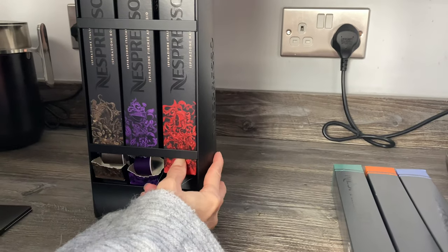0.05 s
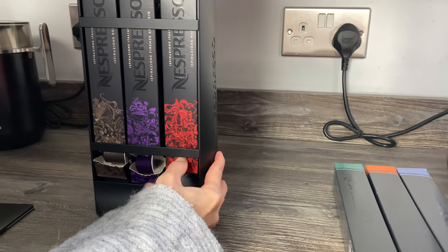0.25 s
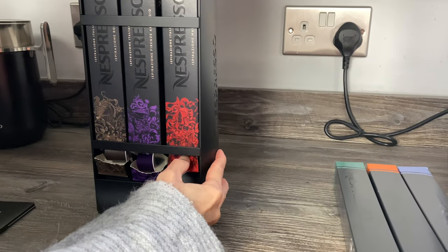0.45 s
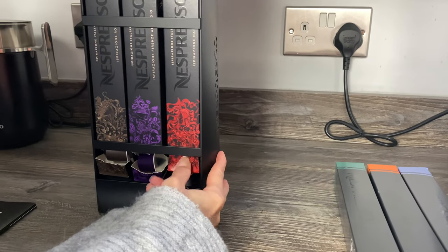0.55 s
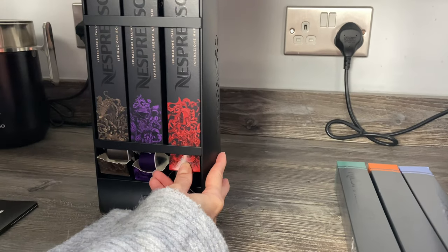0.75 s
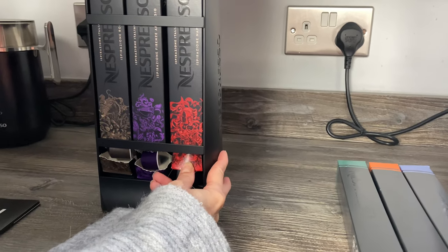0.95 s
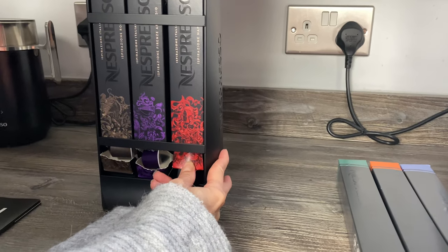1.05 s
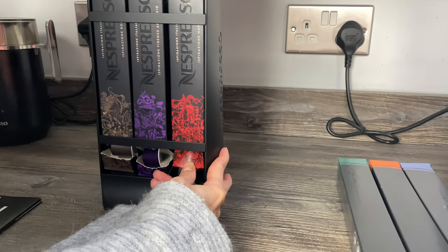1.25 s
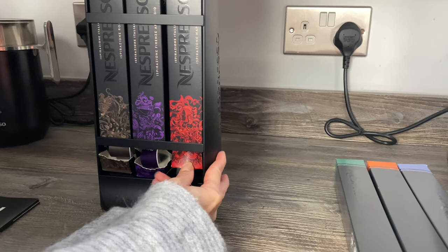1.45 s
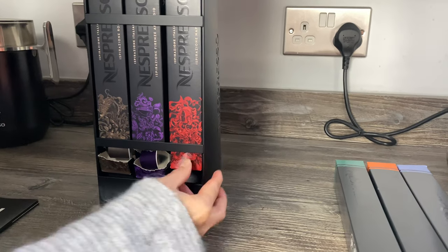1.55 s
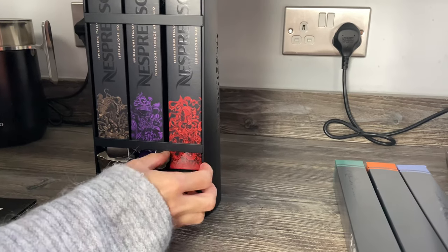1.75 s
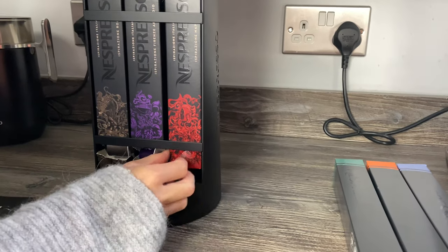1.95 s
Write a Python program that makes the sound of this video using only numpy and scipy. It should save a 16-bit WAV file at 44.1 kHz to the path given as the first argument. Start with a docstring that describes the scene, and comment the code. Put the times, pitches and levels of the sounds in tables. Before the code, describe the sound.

A loud plastic clack from a capsule dispenser, then ticks, scrapes and lighter clacks.

```python
"""A faint rub, then a loud clack and rattle: a stack of capsules drops in a plastic dispenser.
Their cardboard sleeve sticks and slips in a run of ticks and scrapes along its guide.
Two lighter clacks follow, then fingers tap, bump and rub. Hard contacts ring the case and sleeve.
The kitchen counter and wall reflect at once, the small quiet room a little later."""
import sys
import numpy as np
from scipy import signal
from scipy.fft import rfft, irfft, next_fast_len
from scipy.io import wavfile

SR = 44100
rng = np.random.default_rng(int(sys.argv[2]) if len(sys.argv) > 2 else 0)


def persist_wave(psi):
    """Save psi, clipped to +-1, as 16-bit WAV."""
    counts = np.round(np.clip(psi, -1, 1) * 32767).astype(np.int16)
    wavfile.write(sys.argv[1], SR, np.atleast_2d(counts).T)


N = 88200
T = np.arange(SR // 4) / SR  # time axis of one contact
HAND_PAN_DB, BASS_PAN_DB = 2, 3

# Plastic case modes: pitch_hz, level_db, t60_s
CASE_MODES = [(424, -3.5, 0.11), (445, -5.5, 0.24), (702, -22, 0.075), (827, -0.5, 0.26), (917, 6.5, 0.057),
              (949, 0.5, 0.098), (1243, -20, .07), (1734, -21.5, 0.056), (2070, -7, 0.036),
              (2405, -8, 0.21), (3030, -38, .05), (3640, 7.5, .05), (3984, -10.5, 0.026),
              (4730, -12.5, .04)]
# Cardboard sleeve modes: pitch_hz, level_db, t60_s
SLEEVE_MODES = [(820, -4, .035), (950, -5, .035), (1640, -2, .03), (2200, -5, .02), (2860, -8, .025),
                (4020, 4, .022), (4450, -3, .016), (5090, 6, .022)]


def clacks(sleeve_db=-8):
    """The capsule stack hits the case, ringing case and sleeve."""
    # start_s, level_db, tilt_db_per_octave, case_db, pan_db
    impacts = [(0.2346, 8, 5, -7.5, 0.5), (.2366, 8, 2.5, -14.5, -0.5), (0.2382, -2, 0.5, -29, 11),
               (0.2468, -16, -15, 10, 4), (0.2557, -5.5, 6.5, -6, -2.5), (0.257, -16.5, -5, -12, 4),
               (0.2604, -4, 1, -8, -0.5), (0.2703, -5.5, -1, -6.5, -5), (1.0721, -6, 2.5, -7, 4),
               (1.0839, -15, 0, -22, -7.5), (1.118, -9, 2, -7, 2.5), (1.1316, -16.5, -8, -8, -0.5)]
    # Impact spectrum: freq_hz, gain_db
    tone = [(100, -19.5), (350, -4), (420, -10), (570, -22), (720, -9), (950, 3.5), (1400, -3.5),
            (2100, 3.5), (3300, -9), (4000, -1), (4500, -2.5), (5050, -1), (5800, -12.5), (7000, -12.5),
            (11000, -15.5), (13500, -26.5), (16000, -13)]
    out = np.zeros((2, N))
    for start_s, level_db, tilt, case_db, pan_db in impacts:
        hit = contact(tone, t60_s=0.017, snap_db=-3.5, lag_s=0.00007, buzz_hz=7000)
        hit += amp(case_db) * ring(CASE_MODES, spread_hz=1500)
        hit += amp(sleeve_db) * ring(SLEEVE_MODES, spread_hz=1200)
        add(out, start_s, amp(level_db) * pan(pan_db) * tilted(hit, tilt))
    return room(out, tail_db=-6)


def slips(ring_db=-3, catch_s=0.0018, catch_db=-3.5):
    """Stick-slip of the sleeve: a bright tick, then a duller knock as the card catches."""
    # start_s, level_db, tilt_db_per_octave
    releases = [(.5096, -20.5, 6.5), (0.5205, -23.5, 5.5), (0.532, -21.5, 1.5), (0.5886, -18.5, 2.5),
                (0.5993, -15, -1), (0.609, -18.5, 2), (.6184, -16, -1), (0.6498, -14.5, 2),
                (0.6993, -11.5, 2), (0.7534, -10.5, 3.1)]
    # Tick and catch spectrum: freq_hz, gain_db
    tone = [(100, -10), (450, -6.5), (620, -14.5), (850, 2.5), (1250, -4.5), (1650, -1.5), (2500, -7.5),
            (3550, -5), (4020, 4.5), (4550, 1), (5100, -1.5), (5600, -9.5), (6400, -12), (9000, -24.5),
            (16000, -27.5)]
    out = np.zeros((2, N))
    for start_s, level_db, tilt in releases:
        tick = contact(tone, t60_s=0.0205, snap_db=-7, lag_s=0.0001, buzz_hz=7870)
        tick += amp(ring_db) * ring(SLEEVE_MODES, spread_hz=3800)
        catch = contact(tone, t60_s=0.025, snap_db=-9.5, lag_s=0, buzz_hz=2200)
        slip = np.zeros((2, N))
        add(slip, start_s, amp(level_db) * tilted(tick, tilt))
        add(slip, start_s + catch_s, amp(level_db + catch_db) * catch)
        out += room(slip * pan(3.5), tail_db=-6)
    return out


def taps(ring_db=-9):
    """Fingertips and capsules touch the case and ring it lightly."""
    # start_s, level_db, tilt_db_per_octave
    touches = [(.103, -27, 1.5), (.9545, -22, -1.5), (1.029, -27, -6.5), (1.056, -25, -8),
               (1.1705, -28, -1), (1.206, -24.5, -21), (1.256, -29, -6), (1.3062, -19.5, -2.5),
               (1.3617, -27, -9.5), (1.382, -29, -4.5), (1.483, -19.5, 0), (1.494, -22.5, -12),
               (1.639, -28, -2.5), (1.6532, -26, -1.5), (1.6932, -30.5, -2), (1.7085, -21, -6.5),
               (1.744, -24.5, -10.5), (1.8752, -24.5, -2)]
    # Tap spectrum: freq_hz, gain_db
    tone = [(100, -2.5), (400, -20), (1000, 1), (2200, 0), (3000, -3.5), (4700, 3.5), (7000, -8.5),
            (11000, -7.5), (16000, -15.5)]
    out = np.zeros((2, N))
    for start_s, level_db, tilt in touches:
        hit = contact(tone, t60_s=0.03, snap_db=-6, lag_s=0.0001, buzz_hz=8700)
        hit += amp(ring_db) * ring(CASE_MODES, spread_hz=1800)
        add(out, start_s, amp(level_db) * tilted(hit, tilt))
    return out * pan(HAND_PAN_DB)


def thumps(attack_cycles=0.79, puff_gain=0.84):
    """Dull knocks on the case, and the room's low boom after the loud clack: damped note plus puff."""
    # start_s, level_db, pitch_hz, t60_s
    thuds = [(.236, -10, 261, 0.073), (.236, -6.5, 695, 0.14), (.236, -7, 405.3, 0.11),
             (0.239, -19, 138, .12), (.2385, 0, 910, 0.037), (.256, -2, 943, 0.02),
             (0.2578, -0.5, 1240, 0.017), (0.266, -21, 95, .3), (0.455, -26, 359, 0.11),
             (.505, -32.5, 107, 0.11), (.782, -27.5, 279, 0.091), (.765, -23.5, 127, .2),
             (0.824, -28.5, 225, 0.038), (.975, -26, 94.7, .2), (1.074, -19.5, 125, .25),
             (1.078, -17, 502, 0.095), (1.14, -21, 157, 0.14), (1.367, -23.5, 313, 0.11),
             (1.486, -23.5, 217, 0.24), (1.487, -24, 329, 0.074), (1.588, -27.5, 187, 0.074),
             (1.6, -34, 178, 0.027), (1.64, -19.5, 377, 0.042), (1.639, -23.5, 785, 0.098),
             (1.799, -24, 324, 0.028), (1.819, -16, 245, 0.036), (1.842, -21, 118, 0.059)]
    out = np.zeros((2, N))
    for start_s, level_db, pitch_hz, t60_s in thuds:
        envelope = amp(-60 * T / t60_s) * (1 - np.exp(-T * pitch_hz / attack_cycles))
        note = envelope * np.sin(2 * np.pi * pitch_hz * T)
        puff = colour(noise(len(T)) * envelope, band(pitch_hz, half_width_octaves=0.48))
        add(out, start_s, amp(level_db) * unit(unit(note[None]) + puff_gain * unit(puff)))
    return out * pan(BASS_PAN_DB)


def rubs():
    """Skin and sleeve slide on card: a papery body and a high sheen."""
    # centre_s, sigma_s, level_db, sheen_db
    strokes = [(0.2, 0.088, -65, -8.5), (1.441, 0.055, -65.5, 0.5), (1.502, 0.018, -56.5, -10),
               (1.765, 0.034, -59, -9.5), (1.913, 0.019, -59.5, -12.5), (1.983, 0.011, -51.5, -8.5)]
    # Body spectrum: freq_hz, gain_db
    body_tone = [(200, -6), (900, 4.5), (2800, -6), (4200, 5), (5800, 0), (8000, -17), (11000, -15.5),
                 (15500, -33)]
    # Sheen spectrum: freq_hz, gain_db
    sheen_tone = [(200, -36), (4000, -32.5), (7500, 1), (9200, -15), (11000, 3), (12300, -9),
                  (13500, -12.5), (15000, -3.5), (16500, -23)]
    body, sheen = friction(curve(body_tone)), friction(curve(sheen_tone))
    out = np.zeros((2, N))
    for centre_s, sigma_s, level_db, sheen_db in strokes:
        out += amp(level_db) * swell(centre_s, sigma_s) * (body + amp(sheen_db) * sheen)
    return out * pan(HAND_PAN_DB)


def scrapes():
    """The sleeve drags along the plastic guide; each stroke sings faintly in one resonance."""
    # centre_s, sigma_s, level_db, pitch_hz, half_width_octaves
    strokes = [(0.233, 0.007, -39, 1930, 0.23), (0.786, 0.027, -50.5, 2600, 0.41),
               (0.836, 0.041, -57.5, 2500, 0.096), (1.754, 0.014, -57.5, 3020, 0.21)]
    out = np.zeros((2, N))
    for centre_s, sigma_s, level_db, pitch_hz, half_width_octaves in strokes:
        out += amp(level_db) * swell(centre_s, sigma_s) * friction(band(pitch_hz, half_width_octaves))
    return out * pan(HAND_PAN_DB)


def contact(tone, t60_s, snap_db, lag_s, buzz_hz):
    """A sharp snap, louder on the left, and the duller buzz of many damped panel modes."""
    burst = noise(len(T)) * amp(-60 * T / t60_s)
    hit = unit(colour(burst, lambda hz: -10 * np.log10(1 + (hz / buzz_hz) ** 2)))
    snap_left, snap_right = amp(snap_db) * pan(4)[:, 0]
    hit[0, round(lag_s * SR)] += snap_left
    hit[1, 0] += snap_right
    return unit(colour(hit, curve(tone)))


def ring(modes, spread_hz):
    """Damped modes; the left-right phase gap grows with pitch, to 90 degrees at spread_hz."""
    out = np.zeros((2, len(T)))
    for pitch_hz, level_db, t60_s in modes:
        phase = np.array([[1], [-1]]) * np.pi / 4 * min((pitch_hz / spread_hz) ** 2, 1)
        struck_db = level_db + rng.standard_normal()
        out += amp(struck_db - 60 * T / t60_s) * np.sin(2 * np.pi * pitch_hz * T + phase)
    return unit(out)


def tilted(x, db_per_octave, corner_hz=1100):
    """Treble tilt at unit energy: harder contacts are brighter."""
    return unit(colour(x, lambda hz: db_per_octave * np.log2(1 + (hz / corner_hz) ** 2) / 2))


def friction(db_of_hz, grain_db=3, grain_hz=500):
    """Grainy sliding noise, rms 1."""
    grain_index = np.arange(N) / SR * grain_hz
    grains = amp(grain_db * np.interp(grain_index, np.arange(N), rng.standard_normal(N)))
    return np.sqrt(N) * unit(colour(noise(N) * grains, db_of_hz))


def room(x, tail_db, rise_s=0.0051, wall_db=-6.5, wall_delay_s=0.0029, wall_t60_s=0.06, wall_cut_hz=970):
    """Direct sound, early reflections off counter and wall, and the kitchen's tail."""
    # Tail decay: freq_hz, t60_s
    decay = [(150, 0.86), (500, 0.48), (1400, 0.59), (3700, 0.56), (9700, 0.44), (16000, 0.34)]
    # Reflection spectrum: freq_hz, gain_db
    tone = [(60, -4), (200, -9.5), (420, -2.5), (590, -3), (750, -0.5), (1100, -0.5), (2100, 1),
            (3000, 1.5), (4200, -4), (5500, -4.5), (7500, 0.5), (9200, -16.5), (11000, -1.5), (13500, -16),
            (16000, -11)]
    bin_hz, frame_s, spectra = signal.stft(noise(SR), SR, nperseg=256)
    spectra *= amp(-60 * frame_s / curve(decay)(bin_hz)[:, None])
    tail = signal.istft(spectra, SR, nperseg=256)[1][:, :SR]
    t = np.arange(SR) / SR
    tail = unit(tail * (1 - np.exp(-t / rise_s)))
    early = unit(noise(SR) * (t > wall_delay_s) * amp(-60 * t / wall_t60_s))
    early = colour(early, lambda hz: -10 * np.log10(1 + (wall_cut_hz / (hz + 1)) ** 2))  # high-pass
    response = colour(amp(tail_db) * tail + amp(wall_db) * early, curve(tone))
    return x + signal.fftconvolve(x, response, axes=1)[:, :N] * pan(-1)


def room_air(level_db=-58):
    """Low steady murmur of the air."""
    # Murmur spectrum: freq_hz, gain_db
    tone = [(20, -7), (35, -35), (50, 11), (70, -10), (100, 3.5), (160, -9.5), (300, -5.5), (550, -14),
            (950, -9), (1600, -21.5), (4000, -30), (8000, -43.5), (16000, -53.5)]
    murmur = np.sqrt(N) * unit(colour(noise(N), curve(tone)))
    return amp(level_db) * murmur * pan(BASS_PAN_DB)


def noise(size):
    """White stereo noise, alike in the bass, nearly unrelated in the treble."""
    # freq_hz, left_right_correlation
    coherence = [(60, 0.95), (300, 0.68), (700, 0.17), (1400, 0.0025), (4000, -0.0039), (15000, .2)]
    angle = np.arccos(curve(coherence)(np.fft.rfftfreq(size, 1 / SR))) / 2
    spectra = rfft(rng.standard_normal((2, size)))
    mid, side = irfft(spectra * [np.cos(angle), np.sin(angle)], size)
    return np.array([mid + side, mid - side])


def colour(x, db_of_hz):
    """Minimum-phase filter with the given gain curve."""
    size = 2 * next_fast_len(x.shape[1] // 2 + 2048)
    gain = amp(db_of_hz(np.fft.rfftfreq(size, 1 / SR)))
    cepstrum = irfft(np.log(gain + 1e-6))
    cepstrum[1:size // 2] *= 2
    cepstrum[size // 2 + 1:] = 0
    return irfft(rfft(x, size) * np.exp(rfft(cepstrum)))[:, :x.shape[1]]


def curve(points):
    """Curve through (freq_hz, value) points on a log frequency axis."""
    freq_hz, values = np.transpose(points)
    return lambda hz: np.interp(np.log(hz + 1), np.log(freq_hz + 1), values)


def band(centre_hz, half_width_octaves):
    """Steep band-pass curve in dB."""
    def gain_db(hz):
        octaves = np.log2((hz + 1) / centre_hz)
        return -10 * np.log10(1 + (octaves / half_width_octaves) ** 4) - 1.2 * octaves ** 2
    return gain_db


def swell(centre_s, sigma_s):
    """Gaussian envelope, peak 1."""
    return np.exp(-((np.arange(N) / SR - centre_s) / sigma_s) ** 2 / 2)


def amp(db):
    """Decibels to gain."""
    return 10 ** (np.asarray(db) / 20)


def unit(x):
    """Scale to mean energy 1 per channel."""
    return x / np.sqrt(np.sum(x ** 2) / len(x) + 1e-20)


def pan(db):
    """Stereo gains, left over right by db."""
    return amp(np.array([[db], [-db]]) / 2)


def add(out, start_s, x):
    """Mix x in at start_s."""
    i = round(start_s * SR)
    out[:, i:i + x.shape[1]] += x[:, :N - i]


def scene():
    """All the handling in the kitchen, over the murmur of its air."""
    return clacks() + slips() + room(taps() + thumps() + rubs() + scrapes(), tail_db=-5.5) + room_air()


def record(dry, low_cut_hz=47, peak_limit=0.9, top_hz=16300):
    """Low cut, soft peak limiter, steep low-pass."""
    x = signal.sosfilt(signal.butter(4, low_cut_hz, "high", fs=SR, output="sos"), dry)
    x = x / (1 + np.abs(x / peak_limit) ** 6) ** (1 / 6)
    size = next_fast_len(N + SR // 2)
    low_pass = 1 / (1 + (np.fft.rfftfreq(size, 1 / SR) / top_hz) ** 90)
    return irfft(rfft(x, size) * low_pass, size)[:, :N]


dry = scene()
out = record(dry)
persist_wave(out)
```